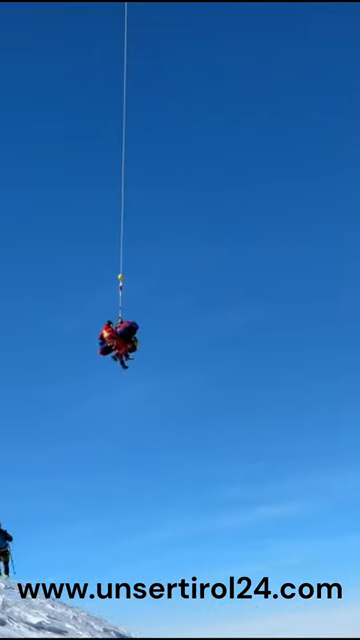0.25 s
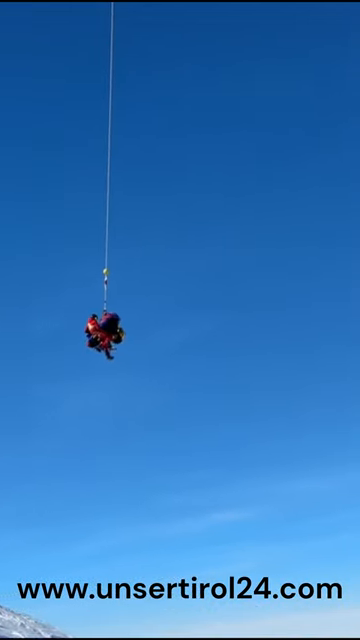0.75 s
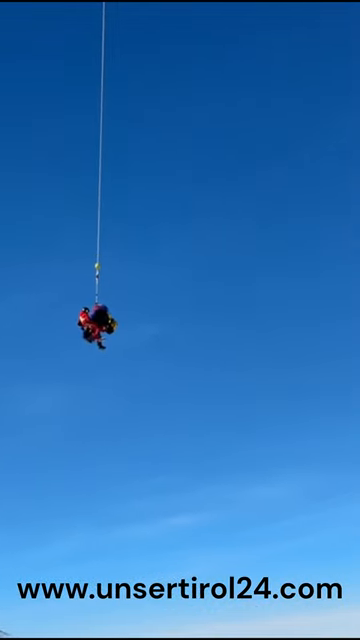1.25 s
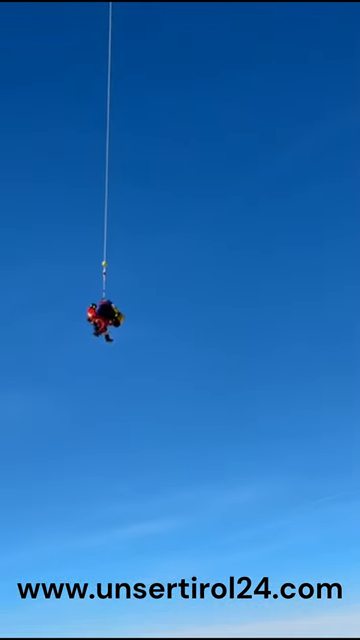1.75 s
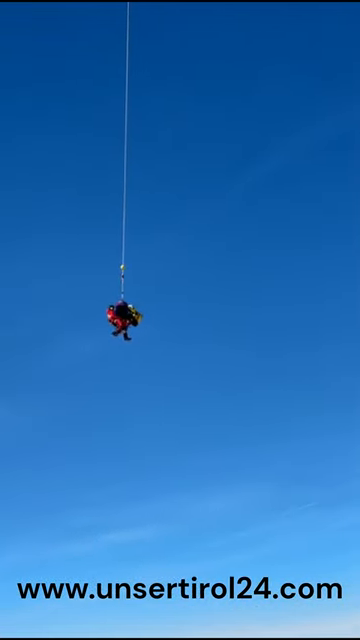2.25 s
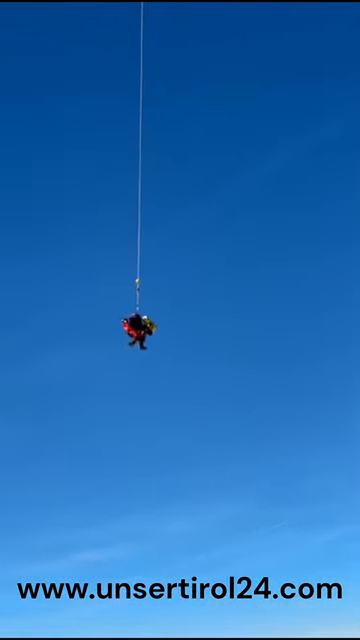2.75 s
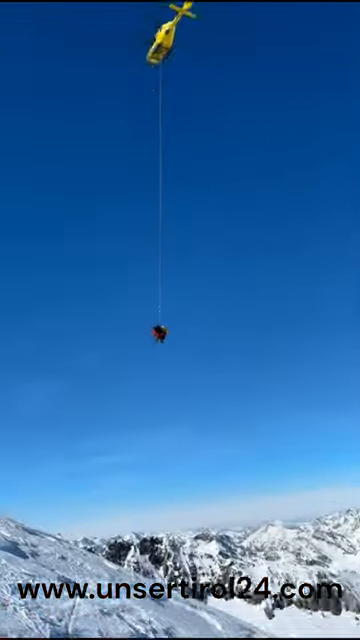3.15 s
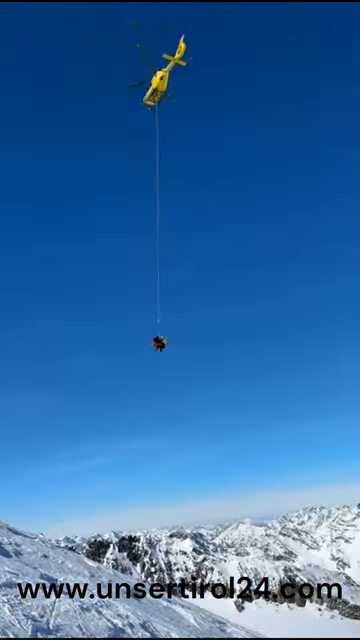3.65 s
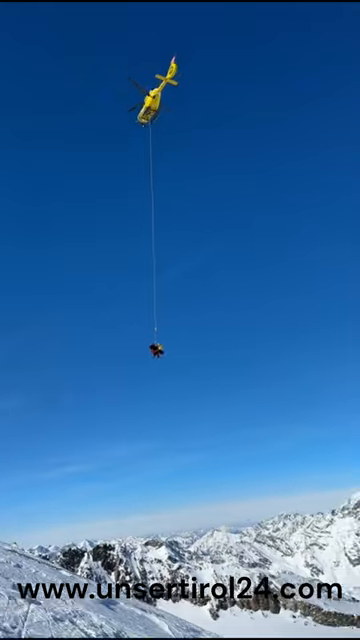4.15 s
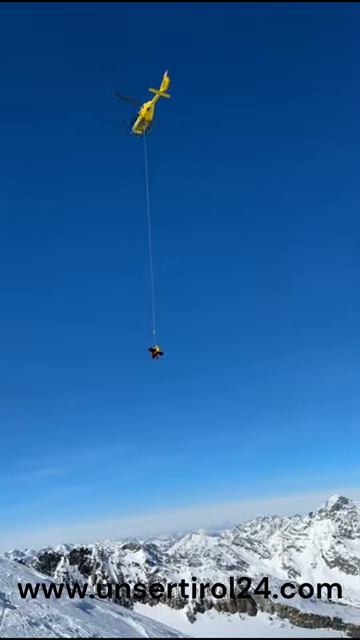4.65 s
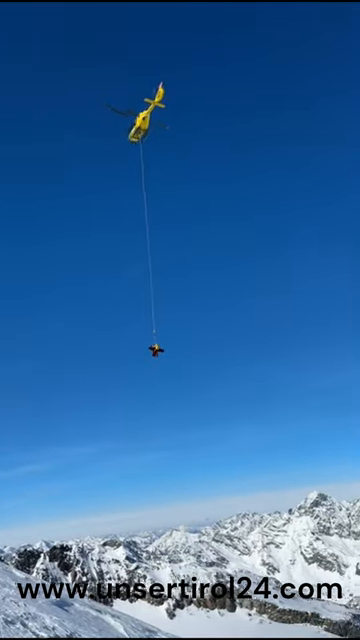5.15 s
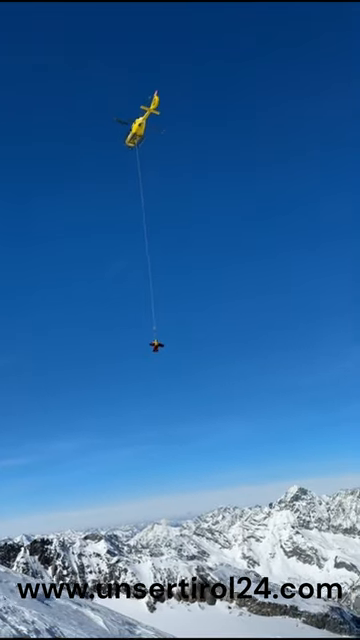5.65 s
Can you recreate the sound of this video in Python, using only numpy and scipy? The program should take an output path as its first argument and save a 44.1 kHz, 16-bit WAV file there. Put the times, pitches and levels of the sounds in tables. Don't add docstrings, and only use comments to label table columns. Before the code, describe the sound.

Open air on a snowy summit, heard through a wind-buffeted stereo phone with slightly hollow, compressed highs. A knock and low gust open the sound while a helicopter drones overhead: steady tail-fan tones at about 500, 620, 740 and 870 Hz, barely changing pitch, over airy roar, bright hiss and a faint fuzzy whine near 9.4 kHz. From 0.75 s low thumping grows, and from 1.2 to 2.1 s it is loudest, with crisp cracks about every 36 ms and short snow echoes. Around 2.0 s the craft turns; hiss drops abruptly, but slaps continue, strong near 2.4 s and weakening to 2.9 s. Soft low wind bumps cluster from 2.7 to 3.4 s as the fan nearly vanishes. Afterwards the distant helicopter is much quieter: the hum returns around 3.5 s, swells at 4.2-4.8 s, dips at 5, and returns at 5.2-5.6 s, with faint flutter, sparse cracks and gentle breeze.

```python
import sys
import numpy as np
from scipy import signal
from scipy.io import wavfile
from scipy.ndimage import uniform_filter1d

SR = 44100
rng = np.random.default_rng(int(sys.argv[2]) if len(sys.argv) > 2 else 0)


def gain_from_decibels(decibels):
    exponent = np.asarray(decibels, float) / 20
    return 10 ** exponent


def wav_out(sig):
    wavfile.write(sys.argv[1], SR, np.round(np.clip(np.atleast_2d(sig).T, -1, 1) * 32767).astype(np.int16))


N = 260181
T = np.arange(N) / SR

FAR_S = 3.2
TURN_S, TURN_LENGTH_S = 2.03, .08

# t/s, peak level/dB, f/Hz
KNOCKS = [(.086, -9, 250), (1.645, -21, 75), (2.73, -20.5, 100), (2.802, -13, 100), (2.752, -23, 150),
          (2.82, -21, 130), (2.85, -25, 100), (2.888, -23, 277), (2.898, -23, 380), (2.92, -24, 90),
          (2.951, -18.5, 85), (3.033, -26, 150), (3.042, -27, 380), (3.088, -25, 70), (3.108, -26, 110),
          (3.125, -26, 140), (3.15, -29, 300), (3.195, -29, 170), (3.235, -29, 90), (3.272, -27, 110),
          (3.262, -20, 297), (3.425, -21, 353), (5.56, -31.5, 75.4)]
# t/s, half length/s, level/dB, centre f/Hz
GUSTS = [(.08, .14, -28.5, 87.5), (.15, 0.092, -30, 280), (0.825, 0.055, -28.5, 175), (1.05, .25, -26, 230),
         (1.38, 0.2, -28.5, 350), (1.55, .15, -27, 200), (1.67, 0.039, -35.5, 60), (2.04, 0.13, -43, 340),
         (2.2, .12, -33, 110), (2.63, 0.14, -38, 60), (2.79, .05, -33, 100), (2.896, 0.038, -32, 152),
         (2.96, 0.043, -32, 89.5), (3.12, 0.041, -32, 110), (3.187, 0.054, -36, 151),
         (3.28, 0.036, -38, 79), (3.34, 0.037, -34.5, 140), (3.43, .045, -36.5, 330),
         (3.65, 0.036, -42, 150), (4.105, 0.045, -43.5, 298), (4.52, .1, -41, 70), (4.72, .07, -39.5, 140),
         (5.11, 0.14, -40, 91), (5.346, 0.089, -44.5, 161), (5.59, 0.049, -39, 100),
         (5.69, 0.26, -37.5, 220), (0.502, .12, -35.5, 170), (1.897, 0.11, -30, 300), (3.497, .08, -43, 55),
         (3.07, .07, -41, 320), (3.04, .05, -40, 55), (3.76, .08, -46, 60), (4.05, .06, -44, 50),
         (5.88, .06, -42, 55), (.33, .05, -36, 130), (1.96, .05, -33, 170), (1.05, .2, -36, 130),
         (1.75, .08, -34, 150)]
GUST_SPREAD_DB = 6
# centre f/Hz, level/dB, share of the rotor's swell/1
BREEZE = [
    (55, -51, .05),
    (140, -44.5, 0.9),
    (350, -45, 0.64),
]
# f/Hz, level/dB per Hz
BUFFET_SPECTRUM = [(15, -24.5), (28, -12.5), (45, -0.5), (65, -0.5), (95, -4), (130, -23.5), (200, -35)]
WASH_SPECTRUM = [(55, -36), (85, -22), (120, 1.5), (170, 0), (240, -5.5), (320, -21), (450, -37)]
FLUTTER_SPECTRUM = [(150, -30.5), (250, -7.5), (320, 1), (420, -3), (560, -4), (700, -19.5), (1000, -44)]

# t/s, level/dB, lean towards the low roar/dB
AIR = [(.03, -31.5, 4), (.36, -36.5, 1.5), (.6, -33, 6), (.84, -39, 4), (1.14, -36, 5), (1.24, -28.5, 3.5),
       (1.8, -28, 3.5), (2.08, -36.5, 8), (2.43, -32.5, 4.5), (2.9, -38, -5.5), (3.1, -45.5, 2),
       (3.38, -50, 4.5), (3.62, -45, 3.5), (3.95, -45, -0.5), (4.49, -37, 5.5), (4.8, -46.5, 3.5),
       (5.5, -42.5, 5), (5.9, -45.5, 5)]
MIDDLE_DB = -36
# f/Hz, level/dB per Hz
ROAR_SPECTRUM = [(250, -25), (450, -4), (800, 1.5), (1200, -6), (1600, -18.5), (2500, -32.5)]
EDGE_SPECTRUM = [(800, -19), (1400, 0.5), (1900, -2.5), (2400, -.5), (2900, -5.5), (3600, -13.5),
                 (5500, -18.5), (9000, -35)]
HISS_SPECTRUM = [(1500, -27.5), (2800, -12.5), (3700, 2), (4500, 1), (5400, 2.5), (6500, -1), (9000, 3.5),
                 (10600, -1.5)]
HISS_DB, HISS_SHARE = -37.2, .52
EXHAUST_DB = 6.4
HISS_LEAN = .8
# t/s, f/Hz
TURBINE_PITCH = [(0, 9390), (1, 9380), (1.5, 9500), (2.3, 9370), (3.5, 9250), (4.5, 9280), (5.9, 9180)]
TURBINE_DB, TURBINE_SHARE = -42, .12
TURBINE_FAR_DB = 2.5

THUMP_HZ, THUMP_S = 26.77, 1.2075
# t/s, level of orders 2 to 8 (below about 220 Hz)/dB, level of orders 9 and above/dB
THUMP = [(0, -44, -42), (.5, -46, -42), (.75, -35.5, -33), (1.0, -29.5, -31.5), (1.15, -32, -33),
         (1.22, -34.5, -23.5), (1.5, -28.5, -28), (1.65, -29.5, -31.5), (1.85, -43, -42.5),
         (2.3, -49.5, -50), (5.9, -56.5, -56)]
# f/Hz, level/dB
THUMP_TONE = [(70, -31.5), (140, -2), (200, -1), (250, -23), (300, 1.5), (340, 4), (400, -9), (520, -22.5)]
SLAP_HZ = 27.2
# t/s, lead/blade passes
LEAD = [(0, .4), (.6, .1), (1.2, .1), (1.6, .63), (1.8, .735), (2.2, .76), (2.6, .82), (3, .83), (3.8, .95),
        (4.3, .92), (5.9, .88)]
# t/s, level over the roar/dB, swish depth/dB
SLAP = [(0, -6, 2), (1.4, -8, 1), (1.6, -4, 1), (1.8, -4, 2), (2.0, -2, 2), (2.2, -13, 2.5), (2.45, -2, 2),
        (2.7, -3, 3), (2.95, 0, 3.5), (3.1, -17, 3), (4.4, -12, 2), (5.9, -11, 2.5)]
# t/s, peak level/dB, f/Hz
CRACKS = [(1.206, -10, 600), (1.2425, -8, 700), (1.2755, -12, 800), (1.317, -9, 750), (1.3535, -9, 800),
          (1.4615, -11, 800), (1.506, -11, 700), (1.557, -10, 800), (1.591, -8, 900), (1.6265, -11, 1000),
          (1.666, -11, 900), (1.699, -6, 950), (1.7355, -12, 1100), (1.7755, -9, 950), (1.8087, -7.5, 850),
          (1.845, -8, 1000), (1.8475, -5, 800), (1.881, -9, 1400), (1.885, -10, 1300), (1.917, -14, 1400),
          (1.9205, -7, 805), (1.9537, -10, 791), (1.9595, -11, 900), (1.993, -12, 850), (2.028, -12, 800),
          (2.065, -11, 850), (2.104, -20, 800), (2.177, -16, 900), (2.248, -15, 748), (2.29, -14, 900),
          (2.3245, -10, 950), (2.361, -19, 850), (2.396, -6, 900), (2.43, -14, 1300), (2.4665, -11, 1200),
          (2.4685, -11, 800), (2.508, -14, 950), (2.5418, -20, 1400), (2.58, -19, 900), (2.616, -17, 1300),
          (2.652, -21, 1000), (2.686, -24, 1400), (2.728, -22, 1500), (2.763, -21, 1300),
          (2.7995, -22, 1200), (2.838, -23, 1600), (2.874, -20, 1500), (2.912, -22, 1500),
          (3.564, -28, 807), (3.606, -28, 834), (4.411, -17.5, 867), (4.483, -19, 818), (4.52, -21, 1120),
          (5.511, -23, 877)]
SNAP_RATIO, SNAP_DB = 2.27, -9.5
ECHO_S, ECHO_DB = .0045, -7

# t/s, level/dB, upper orders against it/dB
FAN = [(0, -28.5, -8), (.3, -33.5, -3.5), (.66, -25, -13.5), (1.22, -23.5, -10.5), (1.6, -19, -14.5),
       (1.88, -28.5, -6.5), (2.42, -28, -8), (2.74, -47, -4), (3.27, -49, -9.5), (3.46, -41, -15),
       (4.08, -49, -6.5), (4.24, -32.5, -20.5), (4.44, -31, -10), (4.82, -35, -19), (4.99, -51, 0),
       (5.24, -37.5, -17), (5.54, -35, -10), (5.9, -41, -12)]
# t/s, f/Hz
SHAFT = [(0, 124.15), (.6, 123.85), (.9, 123.85), (1.5, 124.2), (2.1, 124.4), (2.7, 123.75), (3.6, 123.65),
         (4.0, 123.2), (4.8, 123.1), (5.1, 122.85), (5.9, 122.85)]
# order/1, level column it follows/1, level against it/dB
FAN_ORDERS = [(3, 3, -6), (4, 0, 1), (5, 1, 1), (6, 2, -0.8), (7, 2, -1.5), (8, 2, -9.5), (9, 1, -9.5),
              (10, 2, -16.5), (12, 2, -15), (16, 3.5, -24)]
# order/1, t/s, half length/s, level/dB
GLINTS = [(4, 1.25, .1, -2), (4, 4.76, .07, 1.5), (4, 4.875, .025, -6), (4, 4.95, .035, 6),
          (4, 5.02, .025, -6), (4, 5.72, .12, -2), (5, .6, .17, 6), (5, 1.3, .15, -2), (5, 1.58, .09, 7),
          (5, 2, .08, -4), (5, 2.45, .1, -5), (5, 5.5, .1, -4), (5, 4.55, .1, 3), (5, 5.3, .12, 3),
          (6, .52, .08, 3), (6, .37, .07, -5), (6, .68, .07, -4), (6, 1.42, .07, -2.5), (6, 1.57, .12, 3),
          (6, 2, .08, 3), (6, 4.27, .1, -3), (6, 4.75, .1, -9), (6, 5.15, .05, 5), (6, 5.72, .12, 6),
          (7, .36, .09, -9), (7, .53, .07, 5), (7, .75, .13, -6), (7, 1.1, .12, 3), (7, 1.72, .08, -3),
          (7, 1.95, .15, -3), (7, 2.17, .07, 3), (7, 2.48, .08, -5), (7, 4.45, .12, 3), (7, 4.87, .15, -5),
          (7, 5.65, .13, 5), (8, .68, .12, 4), (8, 1.55, .1, 2), (8, 4.42, .1, 4), (9, .25, .12, 2),
          (9, .65, .18, 3), (9, 1, .15, -6), (9, 1.4, .12, 8), (9, 4.48, .1, 10), (10, .72, .13, 9),
          (12, 1.3, .15, 5), (12, 1.95, .15, 5), (4, 2.47, .08, -2), (4, 4.28, .08, -1.5),
          (3, 2.35, .15, -5)]
# t/s, half length/s, level/dB
FADES = [(2.66, .07, -3), (3.6, .15, -1.5), (0.497, 0.048, -2), (1.94, 0.045, -5), (2.31, .1, -2.5)]
FIFTH_NEAR_DB, FIFTH_FAR_DB = -2.5, -13
FIFTH_SINK_S, FIFTH_SHARE = .65, .14
THIRD_DB, THIRD_BEAM_DB, THIRD_BEAM_S = -14, 13, 0.33
PAN_NEAR_DB, PAN_FAR_DB = 1.8, 3

# f/Hz, correlation/1
SAME = [(500, .99), (1050, .97), (1400, .99), (4000, .97), (7000, .9), (8500, .8), (9000, .75), (9500, .85)]
# f/Hz, level difference/dB
BALANCE = [(60, 0), (450, 1.8), (850, 2.2), (1120, -1.9), (1500, -1.1), (2200, 0), (3000, 1.5), (3600, 0)]
# f/Hz, phase overhead/rad, phase far off/rad
PORTS = [(4000, 0, .2), (4500, .2, .9), (4820, .8, 2.6), (4950, 3.14, 3.5), (5100, 5.3, 5.3),
         (5300, 6.1, 6.1), (9300, 7.9, 7.9), (10100, 9.2, 9.0)]
# from f/Hz, to f/Hz, share of blocks near/1, share far/1
KEEP_SIDE = [(0, 1300, .93, .92), (1300, 1800, .7, .45), (2600, 3400, .06, .6), (4100, 4650, .03, .7),
             (4650, 5220, .6, .95), (6950, 7500, .2, .04), (7500, 9650, .97, .93), (9650, 10200, .22, .1)]
# f/Hz, share of blocks near/1, share far/1
KEEP_MID = [(4720, 1, 1), (4780, 1, .58), (4960, 1, .58), (5020, 1, 1), (8200, 1, 1), (8450, 1, .7),
            (8900, 1, .72), (9050, 1, 1), (9380, 1, 1), (9450, 1, .45), (9640, 1, .4), (9700, -.2, -.2),
            (10500, -.2, -.2)]
TOP_BLIPS = [.24, 1.21, 1.33, 1.5, 1.52, 1.65, 1.83, 1.85, 2.02, 2.68, 2.86, 3.81, 3.89, 3.93, 4.14, 4.18,
             5.14, 5.62]


def evened(x):
    return x / np.sqrt(np.mean(x ** 2) + 1e-20)


def read(points, hz):
    f, value = np.transpose(points)
    return np.interp(np.log(hz + 1), np.log(f + 1), value)


def curves(rows):
    s, *columns = np.transpose(rows)
    return [np.interp(T, s, c) for c in columns]


def ramp(s, length_s):
    return np.clip((T - s) / length_s + .5, 0, 1)


def bell(t, s, half_s):
    return np.exp(-((t - s) / half_s) ** 2)


def drift(top_hz):
    t = T[::64]
    rates = np.geomspace(top_hz / 20, top_hz, 20)
    slow = sum(np.sin(2 * np.pi * (f * t + rng.random())) / np.sqrt(f) for f in rates)
    return np.interp(T, t, evened(slow))


def noise(spectrum, patchy_db, size=512):
    frames, hz = 4 * N // size + 5, np.fft.rfftfreq(size, 1 / SR)
    hz = hz[hz < min(2 * spectrum[-1][0], 11000)]
    a, b, c, d, patches = rng.standard_normal((frames, len(hz), 5)).T
    patches = uniform_filter1d(patches, size // 64, 0)
    patches = evened(uniform_filter1d(patches, 8192 // size, 1))
    same = np.clip(read(SAME, hz), -1, 1)[:, None]
    left = a + 1j * b
    right = same * left + np.sqrt(1 - same ** 2) * (c + 1j * d)
    level_db = read(spectrum, hz)[:, None] + patchy_db * patches
    half_db = read(BALANCE, hz)[:, None] / 2
    z = np.zeros((2, size // 2 + 1, frames), complex)
    z[:, :len(hz)] = [left * gain_from_decibels(level_db + half_db), right * gain_from_decibels(level_db - half_db)]
    return evened(signal.istft(z, nperseg=size, noverlap=3 * size // 4)[1][:, :N])


def bursts(rows, cycles, trim_db):
    out = np.zeros(N)
    for s, db, hz in rows:
        u = np.arange(int(cycles * SR / hz)) * hz / SR
        part = out[round(s * SR):][:len(u)]
        envelope = np.sin(np.pi * (u / cycles) ** 0.66) ** 2
        part += gain_from_decibels(db + trim_db) * np.sin(2 * np.pi * u) * envelope
    return out


def gust_levels():
    swell_db = curves(AIR)[0] - MIDDLE_DB
    s, half_s, db, hz = np.transpose(GUSTS)[:, :, None]
    t = T[::64]
    shape = bell(t, s, half_s)
    levels = []
    for layer_hz, breeze_db, share in BREEZE:
        gust = shape * gain_from_decibels(db - GUST_SPREAD_DB * np.log2(hz / layer_hz) ** 2)
        power = np.interp(T, t, (gust ** 2).sum(0))
        levels.append(10 * np.log10(power + gain_from_decibels(breeze_db + share * swell_db) ** 2))
    return levels


def wind():
    buffet_db, wash_db, flutter_db = gust_levels()
    buffet = gain_from_decibels(buffet_db - 0.2 + 0.71 * drift(15)) * noise(BUFFET_SPECTRUM, 1.9, size=4096)
    wash = gain_from_decibels(wash_db - 2.0 + 1.3 * drift(25)) * noise(WASH_SPECTRUM, 1.7, size=1024)
    flutter = gain_from_decibels(flutter_db + 0.66 + 0.86 * drift(25)) * noise(FLUTTER_SPECTRUM, 2.7, size=1024)
    calm = gain_from_decibels(-4 * np.exp(-((T - 1.2) / .5) ** 4))
    upper = calm * (wash + flutter)
    apart = np.roll(upper[0], 900) * np.array([[1], [-1]]) * (T > FAR_S)
    return buffet + upper + 0.15 * apart


def knocks():
    return bursts(KNOCKS, 2.24, -1.9)


def turbine():
    turn = np.exp(2j * np.pi * np.cumsum(curves(TURBINE_PITCH)[0]) / SR)
    a, b = rng.standard_normal((2, 2, N))
    r = np.exp(-np.pi * 260 / SR)
    once = signal.lfilter([1 - r], [1, -r], a + 1j * b)
    smear = signal.lfilter([1 - r], [1, -r], once)
    both = np.array([smear[0], .92 * smear[0] + .39 * smear[1]])
    return evened((both * turn).real)


def blade_passes():
    return SLAP_HZ * T + curves(LEAD)[0]


def slap_puffs():
    passes = blade_passes() + .15
    blade = np.floor(passes).astype(int)
    size_db, late = rng.standard_normal((200, 2)).T
    since = (passes - blade - .11 - 0.014 * np.clip(late[blade], -1.5, 2)) / SLAP_HZ
    rise = np.exp(np.minimum(since, 0) / 0.0014)
    decay = np.exp(-np.maximum(since, 0) / 0.0025)
    return evened(np.where(since > 0, decay, rise) * gain_from_decibels(1.1 * size_db[blade]))


def air_levels():
    level_db, lean_db = curves(AIR)
    swell_db = level_db - MIDDLE_DB
    facing = 1 - ramp(TURN_S, TURN_LENGTH_S)
    hiss_db = HISS_DB + HISS_SHARE * swell_db + (EXHAUST_DB - HISS_LEAN * lean_db) * facing
    turbine_db = TURBINE_DB + TURBINE_SHARE * swell_db + TURBINE_FAR_DB * ramp(4.1, 1.0) + 1.5 * drift(6)
    return level_db + lean_db, level_db, hiss_db, turbine_db


def air():
    roar_db, edge_db, hiss_db, turbine_db = air_levels()
    slap_db, depth_db = curves(SLAP)
    swish_db = depth_db * (np.cos(2 * np.pi * (blade_passes() - .04)) + 0.38 * drift(30))
    slap = gain_from_decibels(slap_db - 7.5) * slap_puffs()
    roar = gain_from_decibels(roar_db - 1.5) * np.hypot(gain_from_decibels(swish_db), slap) * noise(ROAR_SPECTRUM, 1.3)
    edge = gain_from_decibels(edge_db + 0.53) * np.hypot(gain_from_decibels(swish_db), 0.99 * slap)
    edge = edge * noise(EDGE_SPECTRUM, 1.72, size=256)
    hiss = gain_from_decibels(hiss_db + 1.5 + 0.77 * swish_db + 0.96 * drift(25)) * noise(HISS_SPECTRUM, 0.82)
    whine = gain_from_decibels(turbine_db + 3.0 + 0.26 * swish_db + 0.89 * drift(30)) * turbine()
    return roar + edge + hiss + whine


def thumps():
    turns = THUMP_HZ * (T - THUMP_S)
    orders = []
    for k in range(2, 20):
        level = gain_from_decibels(read(THUMP_TONE, k * THUMP_HZ) + 2.2 * drift(5.02))
        orders.append(level * np.cos(2 * np.pi * k * turns + 0.44 * drift(3.93) + .3 * k))
    low_db, high_db = curves(THUMP)
    low, high = evened(sum(orders[:7])), evened(sum(orders[7:]))
    return (gain_from_decibels(low_db) * low + gain_from_decibels(high_db) * high) * gain_from_decibels([[.4], [-.4]])


def cracks():
    snaps = np.array(CRACKS) * [1, 1, SNAP_RATIO]
    direct = bursts(CRACKS, 2.0, -2.4) + bursts(snaps, 2.7, SNAP_DB)
    return direct + gain_from_decibels(ECHO_DB) * np.roll(direct, round(ECHO_S * SR))


def fan_levels():
    level_db, upper_db = curves(FAN)
    third_db = level_db + THIRD_DB + THIRD_BEAM_DB * bell(T, TURN_S, THIRD_BEAM_S)
    level_db = level_db + sum(db * bell(T, s, half_s) for s, half_s, db in FADES)
    sink_db = (FIFTH_NEAR_DB - FIFTH_FAR_DB) * np.exp(-T / FIFTH_SINK_S)
    fifth_db = level_db + FIFTH_FAR_DB + sink_db + FIFTH_SHARE * upper_db + 1.1
    seventh_db = level_db + upper_db
    return level_db + .8 * drift(8.8), fifth_db + .8 * drift(8), seventh_db + 1.1 * drift(8), third_db


def glint_db(order):
    return sum(db * bell(T, s, half_s) for k, s, half_s, db in GLINTS if round(k) == round(order))


def fan():
    level_db = fan_levels()
    pan_db = PAN_NEAR_DB + (PAN_FAR_DB - PAN_NEAR_DB) * ramp(FAR_S, 1.2) + .8 * drift(3.3)
    turns = np.cumsum(curves(SHAFT)[0]) / SR
    tone = np.zeros(N)
    for k, column, db in FAN_ORDERS:
        order_db = level_db[int(column)] + db + glint_db(k) + 0.77 + 0.64 * drift(9)
        phase = 2 * np.pi * (k * turns + rng.random()) + 0.2 * drift(11)
        tone += gain_from_decibels(order_db) * np.sqrt(2) * np.cos(phase)
    throb = 1 + 0.14 * np.cos(2 * np.pi * blade_passes())
    return tone * throb * gain_from_decibels(pan_db * np.array([[.5], [-.5]]))


def scene():
    return wind() + knocks() + air() + thumps() + cracks() + fan()


def by_distance(rows, hz, far):
    f, near_value, far_value = np.transpose(rows)
    near_part = np.outer(np.interp(hz, f, near_value), 1 - far)
    return near_part + np.outer(np.interp(hz, f, far_value), far)


def side_kept(hz, far):
    return sum(np.outer((hz >= lo) & (hz < hi), near + (away - near) * far)
               for lo, hi, near, away in KEEP_SIDE)


def low_pass(x):
    return signal.sosfilt(signal.butter(12, 10790, fs=SR, output="sos"), x)


def record(dry):
    hz, t, z = signal.stft(dry, SR, nperseg=2048)
    z = z / np.sqrt(1 + (46 / (hz + 1)) ** 6)[:, None]
    far = np.clip((t - FAR_S) / .6 + .5, 0, 1)
    band = np.arange(len(hz)) // 8
    wobble, luck_mid, luck_side, block = rng.random((len(t), band[-1] + 1, 4)).T
    lead = by_distance(PORTS, hz, far)
    lead = lead + 2.2 * (wobble[band] - .5) * np.sin(lead / 2) ** 2
    left, right = z * np.exp(1j * lead / 2 * np.array([-1, 1])[:, None, None])
    full_mid, full_side = (left + right) / 2, (left - right) / 2
    pairs = np.arange(len(t)) // 2 * 2
    mid_share = by_distance(KEEP_MID, hz, far)
    mid_luck = (.6 * luck_mid + .4 * block[:1])[band][:, pairs]
    mid = full_mid * (mid_luck < mid_share * .8 + .1)
    near_blip = abs(t - np.array(TOP_BLIPS)[:, None]).min(0) < .02
    blip = near_blip & (luck_mid[band] < .4 + .4 * far)
    mid = np.where((mid_share >= 1) | blip, full_mid, mid) * (hz < 10400)[:, None]
    side = full_side * (luck_side[band // 2 * 2][:, pairs] < side_kept(hz, far))
    thin = signal.istft(np.array([mid + side, mid - side]), SR, nperseg=2048)[1][:, :N]
    return low_pass(thin)


dry = scene()
out = record(dry)
wav_out(out)
```